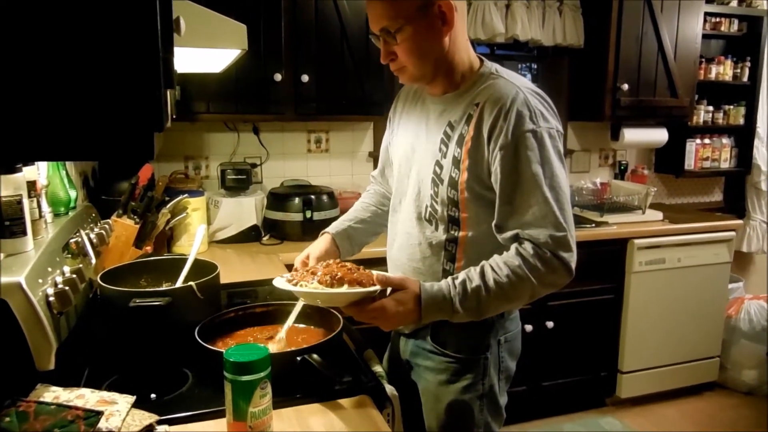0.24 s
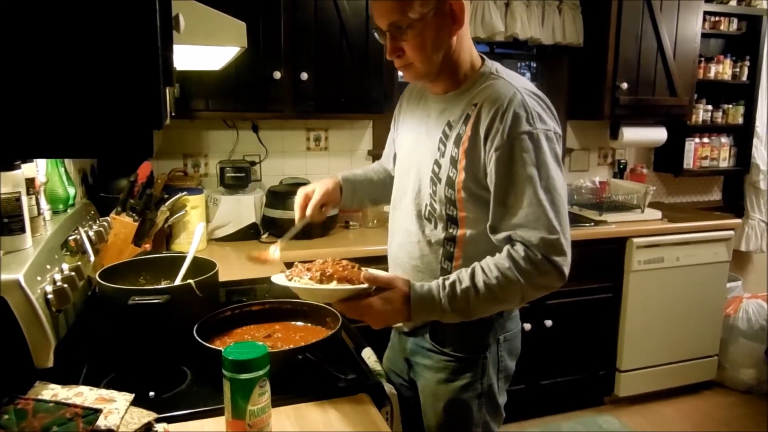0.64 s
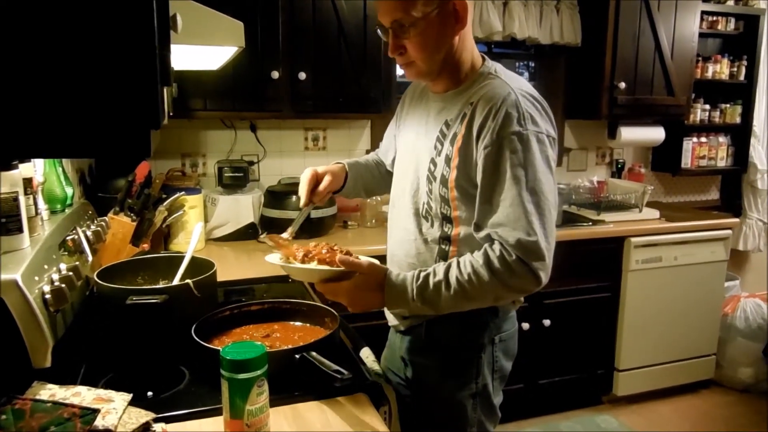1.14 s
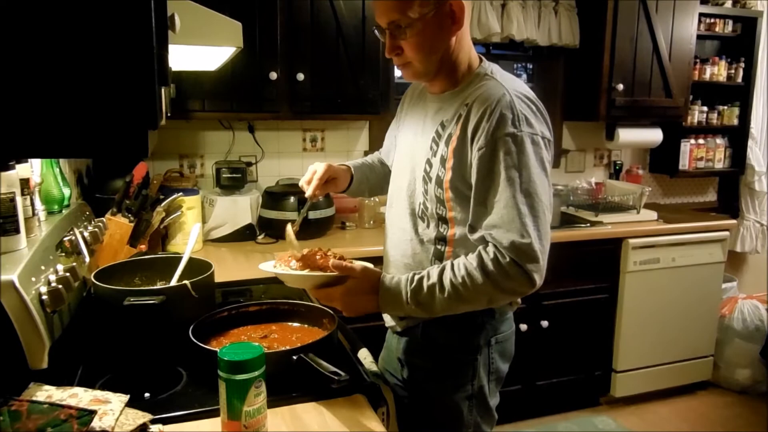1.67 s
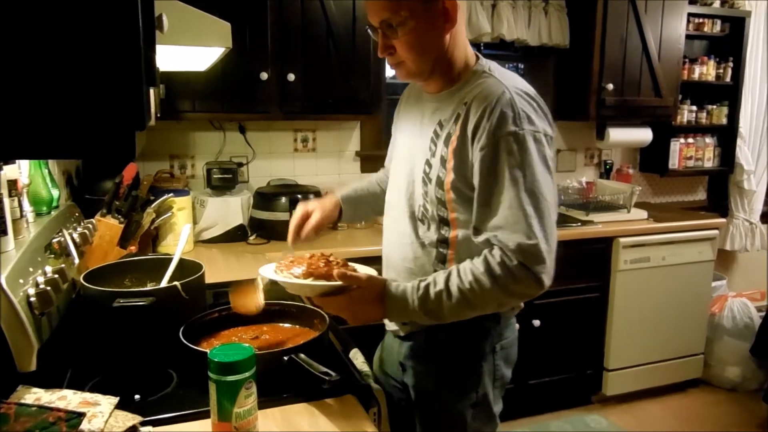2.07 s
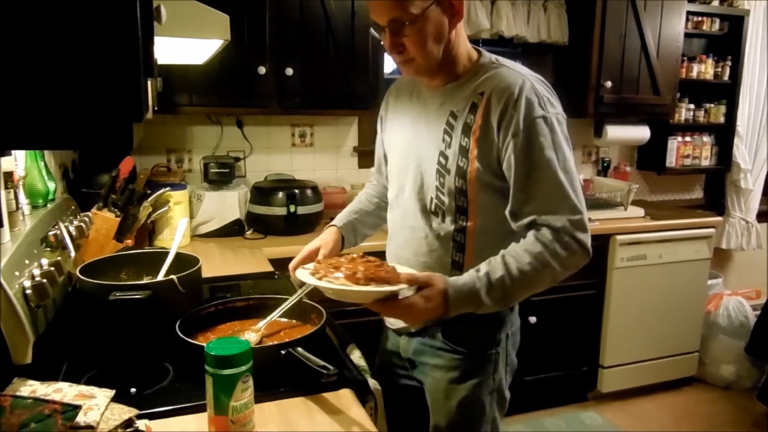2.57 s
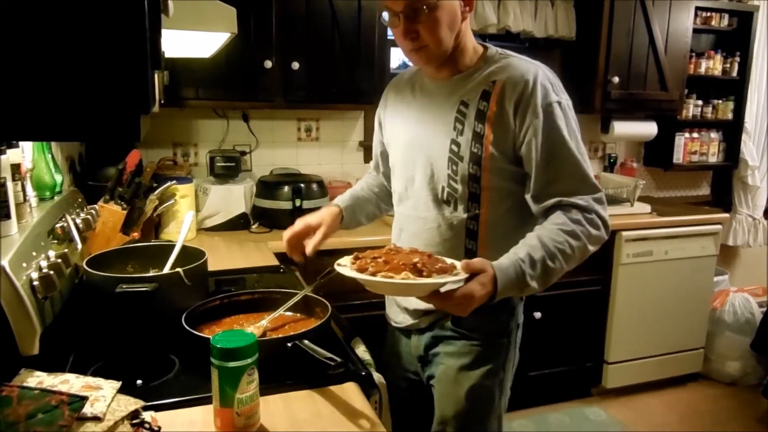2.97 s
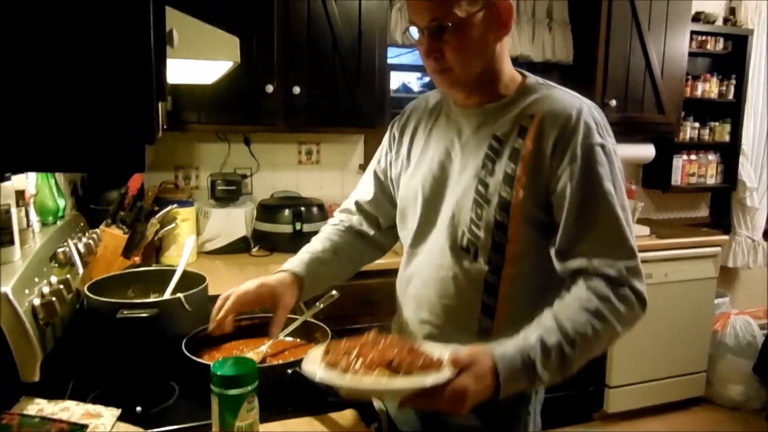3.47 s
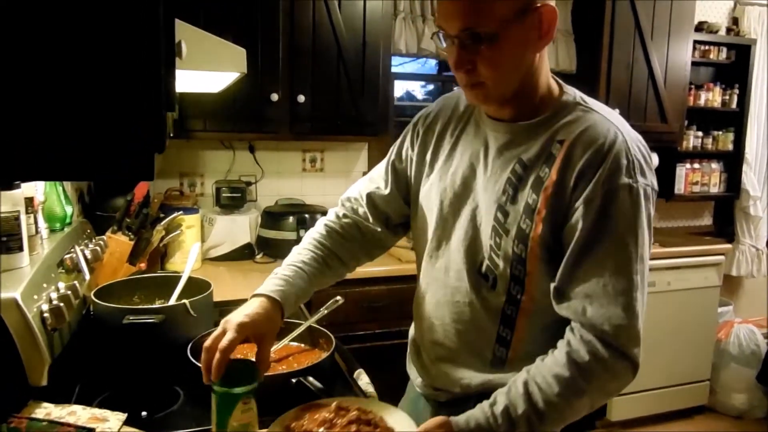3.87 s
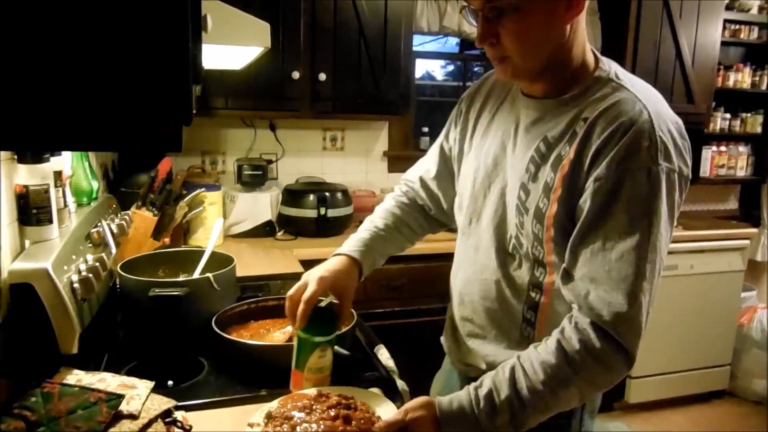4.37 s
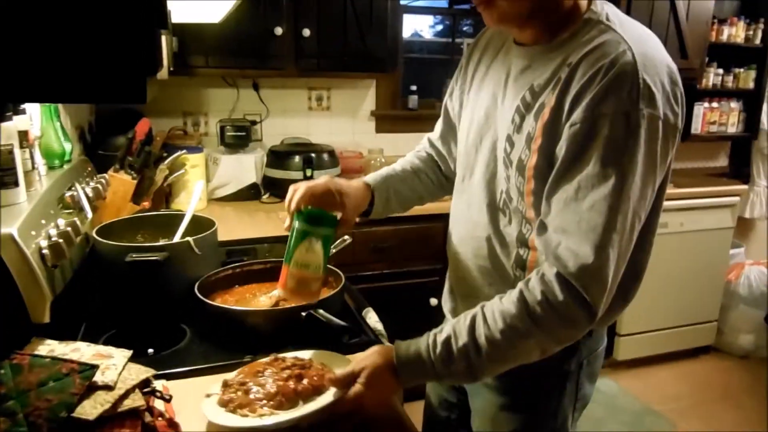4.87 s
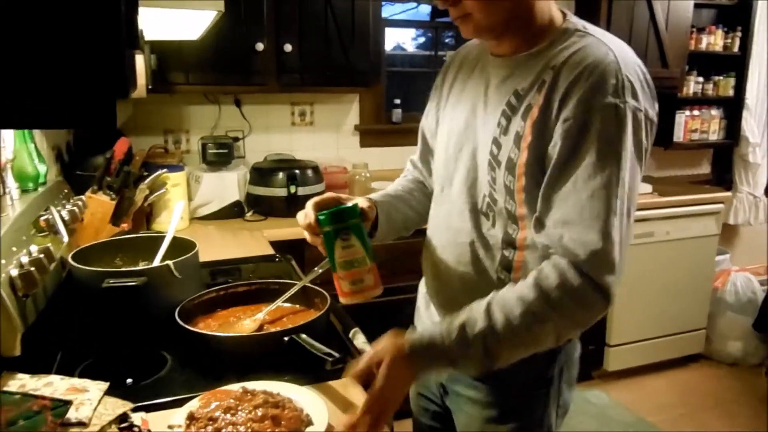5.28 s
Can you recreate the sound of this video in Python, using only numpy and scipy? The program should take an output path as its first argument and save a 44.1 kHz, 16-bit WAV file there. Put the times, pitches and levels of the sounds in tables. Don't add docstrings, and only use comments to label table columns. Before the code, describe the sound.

In a small kitchen, a few spoon clinks and a pan-rim rattle precede loud plate and shaker set-downs and woody counter knocks, fridge humming.

```python
import sys
import numpy as np
from scipy import signal
from scipy.fft import rfft, irfft, next_fast_len
from scipy.io import wavfile
from scipy.ndimage import uniform_filter1d

SR = 44100
rng = np.random.default_rng(int(sys.argv[2]) if len(sys.argv) > 2 else 0)


def makeup_ratio(level_db):
    decades = np.asarray(level_db, float) / 20
    return 10 ** decades


def int16_out(signal):
    q = np.round(np.clip(np.atleast_2d(signal).T, -1, 1) * 32767)
    wavfile.write(sys.argv[1], SR, q.astype(np.int16))


N = 243423


def evened(x):
    return x / np.sqrt(np.mean(x ** 2) + 1e-20)


def read(points, hz):
    f, value = np.transpose(points)
    return np.interp(np.log(hz + 1), np.log(f + 1), value)


def add(mix, s, sound):
    part = mix[:, round(s * SR):][:, :sound.shape[1]]
    part += sound[:, :part.shape[1]]


def panned(db):
    return makeup_ratio(np.array([db / 2, -db / 2])).reshape(2, -1)


def noise(length, size, shape, same):
    hop = size // 4
    hz = np.fft.rfftfreq(size, 1 / SR)[:, None]
    t = np.arange(length // hop + 5) * hop / SR
    a, b, c, d = rng.standard_normal((len(t), len(hz), 4)).T
    like = np.clip(read(same, hz), 0, 1)
    mid = np.sqrt(1 + like) * (a + 1j * b)
    side = np.sqrt(1 - like) * (c + 1j * d)
    spectra = np.array([mid + side, mid - side]) * shape(hz, t)
    return signal.istft(spectra, nperseg=size, noverlap=size - hop)[1][:, :length]


# frequency in Hz, likeness from 0 to 1.
NEAR_SAME = [(60, 0.97), (180, 1), (550, 0.95), (1650, 0.81), (4970, 0.087), (15000, 0.24)]


def blows(events, body, longest, pan_db, clatter_db, treble_loss=0.18):
    modes, colour = body
    out, t = np.zeros((2, N)), np.arange(SR // 3) / SR
    fade_in, fade_out = t / 0.00061, (t[-1] - t) / 0.093
    edges = np.minimum(np.minimum(fade_in, fade_out), 1)
    for s, db, hard_db, t60 in events:
        def shape(hz, u):
            octaves = np.log2((hz + 50) / 1000)
            decay_db = 60 * u / max(t60, .01) * 2 ** (treble_loss * octaves)
            return makeup_ratio(read(colour, hz) + hard_db * octaves - decay_db)
        clatter = noise(len(t), size=256, shape=shape, same=NEAR_SAME)

        ring = np.zeros((2, len(t)))
        spot = rng.standard_normal((14, 2))
        for (hz, mode_db, life), (favour_db, turn) in zip(modes, spot):
            start_db = mode_db + hard_db * np.log2(hz / 1000) + favour_db
            phase = 0.25 * turn * np.array([[1], [-1]]) * hz / 3000
            decay_db = 60 * t / np.clip(life, .01, longest)
            ring += makeup_ratio(start_db - decay_db) * np.sin(2 * np.pi * hz * t + phase)

        clatter_level, ring_level = [np.sqrt(np.mean(v[:, :400] ** 2)) for v in (clatter, ring)]
        crack = 1 + 0.19 * makeup_ratio(-60 * t / 0.0027)
        sound = makeup_ratio(clatter_db) * crack * clatter / clatter_level + ring / ring_level
        sound = sound / np.hypot(makeup_ratio(clatter_db), 1)
        add(out, s + .002, makeup_ratio(db - 9.5) * panned(pan_db) * sound * edges)
    return out


# start in seconds, peak in dB, hardness in dB per octave, clatter t60 in seconds.
PAN_KNOCKS = [
    (.413, -13, 2.5, 0.04),
    (.4185, -22.5, -9, 0.058),
    (.4215, -15.5, -3.5, 0.058),
    (.4248, -20, 2, 0.018),
    (.4275, -26, 2, 0.068),
    (.432, -29, -4, 0.25),
]
# (each row: Hz, dB per Hz).
PAN = ([(256, -1.5, 0.05), (444, -3, 0.089), (591, -8, 0.18), (1083, -4, 0.06), (1273, 7.5, 0.038),
       (1447, 3.5, 0.021), (184, -3, 0.17), (3825, -6, 0.015)], [(100, -49), (617, -5), (1300, -18),
       (1410, -3), (1600, -9), (2130, -16.5), (3090, -17.5), (14000, -66)])


def pan_knocks():
    return blows(PAN_KNOCKS, PAN, 0.12, pan_db=1.5, clatter_db=-3.0)


# start in seconds, peak in dB, hardness in dB per octave, clatter t60 in seconds.
CLINKS = [
    (.6245, -19, 1.4, 0.13),
    (.631, -42, 1.1, 0.08),
]
# (each row: Hz, dB per Hz).
SPOON = ([(765, -12, 0.67), (3700, -30, 0.5), (1084, -11, 0.38), (1205, -3, 0.55), (1645, -6, 0.55),
         (2070, -13, 0.2), (2400, -12, 0.3), (2640, -6, 0.28), (2644, 4, 0.06), (2848, -2, 0.2),
         (3080, -17, .1), (3500, -8, 0.12), (4520, -14, 0.13), (5200, -22, 0.22)], [(100, -35), (700, 3.5),
         (2000, -13), (2800, 3.5), (3900, -12), (5200, -8), (8000, -31), (14000, -42)])


def spoon_clinks():
    return blows(CLINKS, SPOON, 0.9, pan_db=0.5, clatter_db=2)


# start in seconds, peak in dB, hardness in dB per octave, clatter t60 in seconds.
RIM_RATTLE = [(3.007, -23, 1.5, 0.089), (3.013, -23.5, 3, 0.18), (3.019, -27, 1.5, 0.12),
              (3.0235, -21, 2.5, 0.17), (3.029, -26, 4.5, 0.074), (3.034, -23.5, 5.5, 0.08),
              (3.038, -21.5, 1, 0.047), (3.044, -27, 4, 0.035), (3.05, -31.5, 0, 0.18),
              (3.078, -31, -1.5, 0.86), (3.104, -35, 1, 0.22)]
# (each row: Hz, dB per Hz).
RIM = ([(616, 4, 0.62), (1271, 7, 0.088), (1352, 0, 0.056), (1885, -2.5, 0.25), (2357, -4.5, 0.15),
       (2787, 3.5, 0.06), (3070, 6, 0.053), (3370, 3, 0.081), (4174, -15, 0.15), (4740, -6, 0.06),
       (5150, -9, 0.087), (6150, -3, 0.077), (7480, -12, 0.11), (8660, -16, 0.087)], [(100, 3), (950, -2.5),
       (1250, 6), (3300, 0.5), (3800, -13), (4900, -2), (12500, -15), (14500, -41)])


def rim_rattle():
    return blows(RIM_RATTLE, RIM, 0.4, pan_db=.3, clatter_db=-6)


# start in seconds, peak in dB, hardness in dB per octave, clatter t60 in seconds.
PLATE_BLOWS = [
    (4.0023, -3.5, 0.84, 0.31),
    (4.014, -28, 0, .12),
    (4.044, -36, 0.86, 0.18),
    (4.424, -52, 1.5, 0.25),
]
# (each row: Hz, dB per Hz).
PLATE = ([(622, -7.5, 0.09), (1033, -20, 0.18), (1524, -0.5, 0.058), (2170, -20, 0.093), (2634, -2, 0.4),
         (2744, -3, 0.27), (2690, 5, 0.06), (4268, -10, 0.33), (4310, -1, 0.07), (3156, 3, 0.08),
         (3870, -7, 0.064), (5660, -3, 0.033), (6875, -3, 0.057), (8280, -17, 0.11)], [(100, -56),
         (400, -19), (1000, -9.5), (2500, -6), (6000, -15), (12000, -25), (14500, -41), (16000, -71)])


def plate_landing():
    return blows(PLATE_BLOWS, PLATE, .6, pan_db=0.6, clatter_db=-6.0)


# start in seconds, peak in dB, hardness in dB per octave, clatter t60 in seconds.
PLATE_BOUNCES = [
    (4.075, -5.5, 1, 0.17),
    (4.0795, -11, 1, 0.36),
    (4.098, -24.5, -12.5, 0.77),
]
# (each row: Hz, dB per Hz).
PLATE_EDGE = ([(725, -4, 0.11), (1001, -2.5, 0.18), (1550, -16, 0.092), (1574, -0.5, 0.2), (1815, 6, 0.05),
              (1861, 7.5, 0.16), (2470, -1, 0.079), (2656, 2.5, 0.18), (2560, 13.5, 0.056), (3080, 2, 0.11),
              (3480, 12, 0.038), (4200, 2, 0.077), (4500, -11, 0.12), (5670, -8, 0.094)], [(100, -27),
              (400, -16), (1500, -4), (3500, -12.5), (5000, -19.5), (8300, -27), (12300, -42),
              (14500, -93)])


def plate_bounces():
    return blows(PLATE_BOUNCES, PLATE_EDGE, 0.35, pan_db=1.2, clatter_db=-5.5)


# start in seconds, peak in dB, hardness in dB per octave, clatter t60 in seconds.
SHAKER_BLOWS = [
    (4.5115, -7.5, 0.5, 0.04),
    (4.518, -11.5, -5, 0.043),
    (4.526, -14.5, -2.5, 0.28),
    (4.5635, -23, -5.5, 0.084),
]
# (each row: Hz, dB per Hz).
SHAKER = [(636, 6.5, 5.0), (1342, 15.5, 0.13), (1570, -24, 0.49), (2480, -20, 0.13), (2820, -25, 0.38),
          (3300, 24.5, 0.0053), (4200, -29, 0.22)], [(100, -19.5), (665, -8.5), (1300, -10.5), (1560, 0),
          (1810, -17), (3240, -8), (12800, -37.5), (14500, -76)]


def shaker_landing():
    return blows(SHAKER_BLOWS, SHAKER, 0.058, pan_db=0.6, clatter_db=3.0)


# start in seconds, peak in dB, hardness in dB per octave, clatter t60 in seconds.
COUNTER_BLOWS = [
    (4.784, -1, 2.5, 0.097),
    (4.792, -5, -6, 0.19),
    (4.799, -13, 2, 0.19),
    (4.808, -13.5, 0, 0.43),
    (4.823, -11, 0.5, 0.3),
    (4.857, -20, -9, 0.17),
    (4.872, -11, 2.5, 0.1),
    (4.884, -16, -2.5, 0.099),
    (4.912, -24, -8, 0.11),
    (4.943, -44, -3, 0.31),
]
# (each row: Hz, dB per Hz).
COUNTER = ([(256, -12, 0.11), (460, -8, 0.15), (530, -5, .13), (757, -5, .1), (806, 6, 0.2), (910, -2, .12),
           (1082, -3, 0.1), (1225, -6, .15), (1345, -5, .08), (1610, -8, 0.1), (1960, -17, 0.1),
           (2440, -6, .09), (2580, -1, 0.03), (4500, -22, 0.03)], [(100, -50), (240, -15), (457, -7),
           (708, -1.5), (1320, -3.5), (2300, -18), (11300, -44), (14500, -66)])


def counter_blows():
    return blows(COUNTER_BLOWS, COUNTER, 0.3, pan_db=2.0, clatter_db=-2.5)


# start in seconds, peak in dB, hardness in dB per octave, clatter t60 in seconds.
TIP_BLOWS = [
    (5.3205, -18, 0, 0.037),
]
# (each row: Hz, dB per Hz).
TIP = ([(272, -8, 0.089), (550, 4, 0.12), (800, -1, 0.18), (1096, -13, 0.14), (1620, -4, 0.044),
       (2280, -21, .08), (3300, -14, 0.06)], [(100, -40), (500, -6), (1200, -11), (1700, -11), (2500, -17),
       (3400, -18), (14000, -53)])


def tip_blow():
    return blows(TIP_BLOWS, TIP, 0.25, pan_db=1.0, clatter_db=-8.5)


# start in seconds, peak in dB, hardness in dB per octave, clatter t60 in seconds.
LAST_BLOWS = [
    (4.319, -37.5, 7.5, 0.13),
    (4.337, -35.5, -8, 0.12),
    (5.3512, -3, 1, 0.14),
    (5.359, -10, -0.5, 0.15),
    (5.3705, -8.5, -1.5, 0.14),
    (5.3826, -11, -0.5, 0.075),
    (5.401, -32.5, 10, 0.18),
    (5.418, -23, 1.5, 0.074),
    (5.434, -25, -7, 0.09),
]
# (each row: Hz, dB per Hz).
BOARD = ([(225.5, -0.5, 0.21), (264.7, -3, 0.12), (460, -15, 0.15), (520.4, -3, 0.13), (593, -4, 0.13),
         (720, 5, 0.11), (757, -1, 0.094), (853, 0, 0.069), (900, 1.5, 0.12), (1260, -10, 0.28),
         (1600, 3.5, 0.064), (1620, 3, 0.06), (2003, -11, 0.2), (3020, -11, 0.11)], [(100, -45), (216, -7),
         (349, -23), (723, -4), (1140, -16.5), (1600, -14.5), (4520, -30.5), (14500, -66.5)])


def last_blows():
    return blows(LAST_BLOWS, BOARD, 0.25, pan_db=1.5, clatter_db=-3)


# peak in dB, left-right difference in dB, roughness in dB.
SLIDES = [
    (-47.5, 0.5, 0.5),
    (-42, 1, 2),
    (-21.5, 0, 2),
    (-45, 1, 1.5),
]
# time in seconds, level in dB.
SLIDE_SPEEDS = [
    [(0.0, -59.5), (0.046, -58.5), (0.062, -68), (0.106, -62), (0.11, -65.5), (0.234, -50), (0.276, -62),
     (0.292, -55.5), (0.33, -80)],
    [(4.385, -64), (4.415, -56.5), (4.419, -66), (4.431, -48), (4.457, -64), (4.5, -55)],
    [(4.535, -44), (4.562, -40), (4.567, -29.5), (4.578, -26), (4.592, -32), (4.601, -30), (4.612, -34.5),
     (4.647, -50.5), (4.7, -71)],
    [(5.15, -59), (5.162, -57.5), (5.22, -59.5), (5.238, -59), (5.264, -50.5), (5.316, -52), (5.318, -52)],
]
# frequency in Hz, level in dB per Hz.
SLIDE_COLOURS = [
    [(88, -34), (150, -3), (739, -5), (1060, -4.5), (1700, -3.5), (2060, -11.5), (8070, -23.5),
     (14000, -31)],
    [(88, -45), (150, -24), (876, 3), (1100, 4), (2220, -6), (2690, -17), (13000, -26), (14000, -81)],
    [(88, -40), (150, -5), (535, -27), (700, 1), (3030, -9.5), (5610, -9.5), (13300, -22.5), (14300, -55)],
    [(88, -40), (150, -2), (535, 7), (928, -1), (1210, -10), (2000, -6.5), (9760, -25.5), (14000, -32)],
]
# frequency in Hz, width in Hz, boost in dB.
SLIDE_RINGS = [
    [(1400, 97, 3), (1667, 23, 9.5), (2800, 150, 9), (7450, 150, 9), (8900, 80, 10)],
    [(2670, 100, 20.5), (4240, 83, 17), (5600, 80, 13), (6100, 80, 12), (7040, 90, 12), (8150, 78, 11),
     (9500, 80, 5)],
    [(1862, 29, 8), (2910, 200, 10), (5500, 150, 7), (6300, 38, 4), (6970, 50, 9), (7980, 35, 10),
     (8580, 64, 4), (9000, 40, 12), (9700, 140, 7.5), (11300, 44, 12), (12700, 99, 13), (14620, 40, 32)],
    [(1200, 70, 17), (1600, 60, 9)],
]


def slides():
    out = np.zeros((2, N))
    for (db, pan_db, rough_db), speed, colour, rings in zip(SLIDES, SLIDE_SPEEDS, SLIDE_COLOURS, SLIDE_RINGS):
        s, speed_db = np.transpose(speed)
        t = s[0] + np.arange(SR // 3) / SR

        def shape(hz, u):
            boost_db = sum(d / (1 + ((hz - f) / width) ** 2) for f, width, d in rings)
            return makeup_ratio(read(colour, hz) + boost_db + 0 * u)
        catches = evened(uniform_filter1d(rng.standard_normal(len(t)), size=120))
        rub = noise(len(t), size=2048, same=NEAR_SAME, shape=shape)
        rub = evened(rub * makeup_ratio(rough_db * catches))
        edges = np.clip(np.minimum(t - s[0] + .002, s[-1] - t) / 0.008, 0, 1)
        loudness = makeup_ratio(db + np.interp(t, s, speed_db - speed_db.max()))
        add(out, max(s[0], 0), rub * edges * loudness * panned(pan_db))
    return out


TICK_TIMES = [.186, .2335, 2.4548, 2.4556, 2.457, 2.766, 3.108, 3.122, 3.335, 3.340, 3.343, 3.8365, 4.256,
              4.321, 4.874, 5.027, 5.035, 5.0426, 5.0434, 5.268]
# peak in dB, pitch in Hz, width in octaves, t60 in seconds.
TICK_SOUNDS = [(-51.5, 4800, 1.01, 0.023), (-64, 5010, 1.51, 0.018), (-43.5, 4170, 0.23, 0.05),
               (-41, 7200, 1.5, 0.024), (-45.5, 1570, 0.39, 0.022), (-49.5, 4060, 0.082, 0.056),
               (-52, 6160, 0.061, 0.041), (-48.5, 4970, 0.07, 0.031), (-44, 3940, 0.45, 0.011),
               (-47.5, 2500, 0.86, 0.14), (-42.5, 590, 0.82, 0.076), (-37, 2640, 0.88, 0.066),
               (-43.1, 5600, 0.76, 0.031), (-41.5, 240, .8, 0.14), (-46, 7610, 0.035, 0.078),
               (-46, 2510, 2.2, .016), (-39.5, 640, 0.97, 0.2), (-42.5, 2540, 0.44, 0.053),
               (-30.5, 6900, 0.66, 0.0036), (-54, 2310, 0.9, 0.028)]


def ticks(pan_db=1.0):
    out, t = np.zeros((2, N)), np.arange(4096) / SR
    for s, (db, pitch_hz, width, t60) in zip(TICK_TIMES, TICK_SOUNDS):
        def shape(hz, u):
            around_pitch = np.exp(-(np.log2((hz + 50) / pitch_hz) / width) ** 2)
            return makeup_ratio(-60 * u / max(t60, .005)) * around_pitch
        burst = noise(len(t), size=128, same=NEAR_SAME, shape=shape)
        burst = burst * np.sin(np.pi / 2 * np.minimum(t * pitch_hz / 2, 1)) ** 2
        add(out, s, makeup_ratio(db + 6.0) * panned(pan_db) * burst / abs(burst).max())
    return out


# frequency in Hz, left-right difference in dB.
NEAR_LEAN = [(300, 1), (1000, 0), (2500, -1), (5000, 2), (9000, 0), (13000, 4.5)]


def reach_microphones(near):
    size = next_fast_len(N)
    lean = panned(read(NEAR_LEAN, np.fft.rfftfreq(size, 1 / SR)))
    near = irfft(rfft(near, size) * lean, size)[:, :N]
    return signal.sosfilt(signal.butter(6, 165, "high", fs=SR, output="sos"), near)


# start in seconds, level in dB.
THUMPS = [
    (4.01, -48),
    (4.08, -54),
    (4.515, -58),
    (4.79, -50),
    (5.355, -50),
]


def thumps(hz=42, t60=0.26):
    out, t = np.zeros((2, N)), np.arange(SR // 4) / SR
    for s, db in THUMPS:
        shudder = makeup_ratio(db - 60 * t / t60) * np.sin(2 * np.pi * hz * t) * np.minimum(t * hz, 1)
        add(out, s, np.ones((2, 1)) * shudder)
    return out


# frequency in Hz, t60 in seconds.
ROOM = [(150, 0.34), (500, 0.39), (1500, 0.36), (4000, 0.45), (12000, 0.34)]


def kitchen(x):
    tail = noise(SR // 2, size=256, same=NEAR_SAME, shape=lambda hz, u: makeup_ratio(-60 * u / read(ROOM, hz)))
    tail = tail * np.clip(np.arange(SR // 2) / SR / 0.0075 - .5, 0, 1)
    return signal.fftconvolve(x.mean(0)[None], tail / np.linalg.norm(tail[0]), axes=1)[:, :N]


# time in seconds, gain in dB.
CLAMPS = [
    (0.741, -3),
    (3.15, -5),
    (4.139, -7.5),
    (4.642, -1.5),
    (5.47, -3.5),
]


def clamp():
    t = np.arange(N) / SR
    return makeup_ratio(sum(np.interp(t - s, [-0.0045, -0.022, 0.11, 0.14], [0, db, db, 0]) for s, db in CLAMPS))


# lower side tone in dB, main tone in dB, upper side tone in dB.
MOTOR = [(-88, -66, -104), (-73.5, -61.5, -91), (-91, -62.5, -93), (-69.5, -83, -70.5), (-88, -69, -88),
         (-70, -88, -99), (-94, -73, -70), (-84, -84, -109), (-99, -102, -74.5), (-78, -100, -71),
         (-86, -99, -74.5), (-80, -77, -78.5), (-74, -70, -66), (-64, -86, -85), (-94, -63, -104),
         (-95, -79, -73.5), (-73.5, -85, -79), (-80.5, -65, -106), (-92, -71.5, -101), (-80.5, -99, -91),
         (-85, -66.5, -86)]
# frequency in Hz, level in dB.
RUMBLE = [
    (59.4, -77.5),
    (1584.3, -77),
    (1593.7, -69),
]
# frequency in Hz, level in dB per Hz.
AIR = [(20, -18.5), (115, -2.5), (520, -5), (674, -0.5), (1400, -9.5), (1640, -5.5), (3270, -16.5),
       (13100, -30), (15000, -63)]
# frequency in Hz, likeness from 0 to 1.
AIR_SAME = [(60, 1), (180, 0.96), (550, 0.85), (1650, 0.46), (4970, -0.0), (15000, 0)]
# frequency in Hz, left-right difference in dB.
AIR_LEAN = [(60, 1.1), (180, 3.3), (550, 2.0), (1650, 0.58), (4970, 1.1), (15000, 2.1)]


def fridge():
    shaft_hz, mains_hz, throb_s, air_db = 43.074, 120.01, .021, -55
    beat_hz = 3 * shaft_hz - mains_hz
    t, tones = np.arange(N) / SR, np.zeros(N)
    beat = 2 * np.pi * beat_hz * (t - throb_s)
    for order, (low_db, db, high_db) in enumerate(MOTOR, start=2):
        turn = 2 * np.pi * (order * shaft_hz * t + rng.random())
        tones += makeup_ratio(db) * np.cos(turn)
        tones += makeup_ratio(low_db) * np.cos(turn - beat) + makeup_ratio(high_db) * np.cos(turn + beat)
    for hz, db in RUMBLE:
        tones += makeup_ratio(db) * np.cos(2 * np.pi * (hz * t + rng.random()))

    def shape(hz, s):
        depth_db = 1.0 * np.exp(-np.log2((hz + 1) / 1700) ** 2 / 0.4)
        throb_db = depth_db * np.cos(2 * np.pi * beat_hz * (s - .037))
        lean = makeup_ratio(read(AIR_LEAN, hz) / 2)
        return makeup_ratio(read(AIR, hz) + throb_db) * np.array([lean, 1 / lean])
    air = evened(noise(N, size=1024, shape=shape, same=AIR_SAME))
    return np.sqrt(2) * tones * panned(2.0) + makeup_ratio(air_db) * air


def scene():
    near = pan_knocks() + spoon_clinks() + rim_rattle()
    near += plate_landing() + plate_bounces() + shaker_landing()
    near += counter_blows() + tip_blow() + last_blows()
    near += slides() + ticks()
    near = reach_microphones(near)
    return clamp() * (near + makeup_ratio(-12.0) * kitchen(near)) + fridge() + thumps()


def top_cut(x):
    return signal.sosfilt(signal.butter(12, 16510, fs=SR, output="sos"), x)


def record(dry):
    late = np.array([dry[0], np.roll(dry[1], shift=1)])
    rounded = late / (1 + abs(late / .95) ** 4) ** .25
    return top_cut(rounded)


dry = scene()
out = record(dry)
int16_out(out)
```